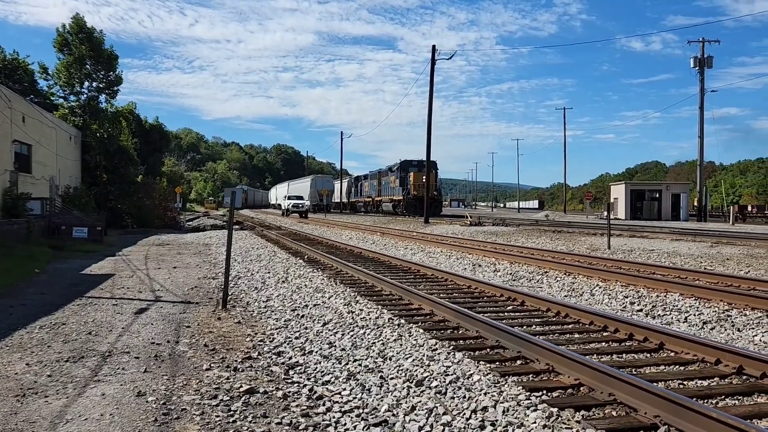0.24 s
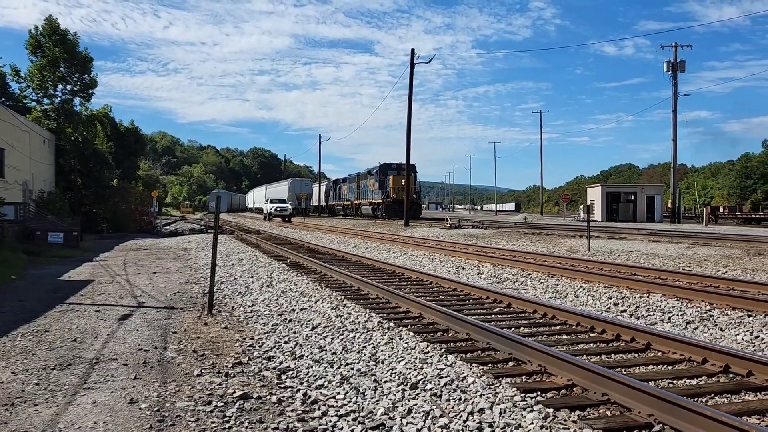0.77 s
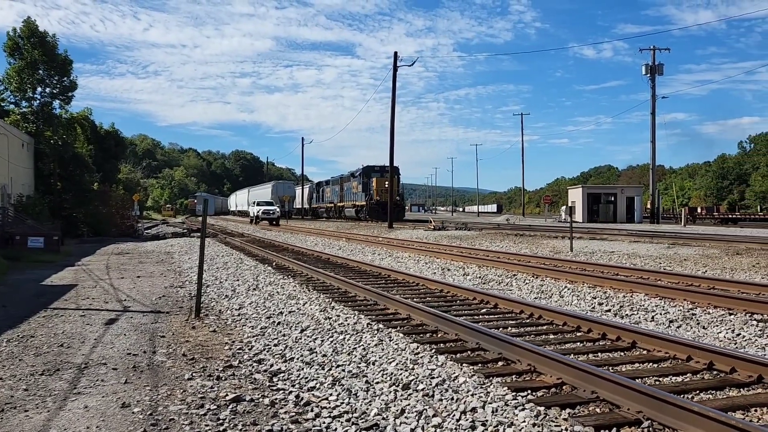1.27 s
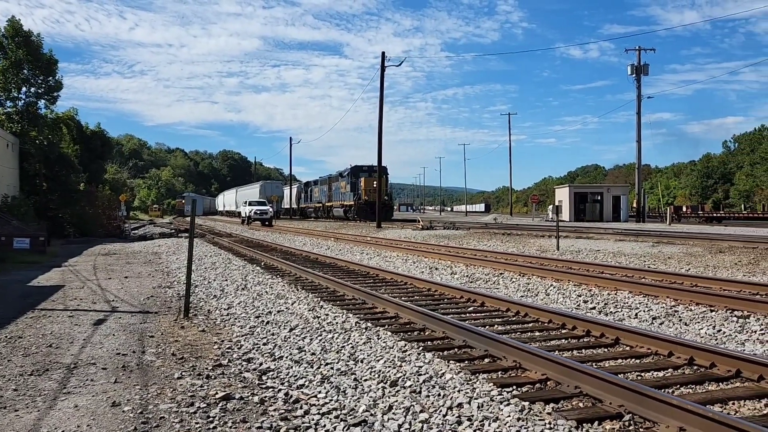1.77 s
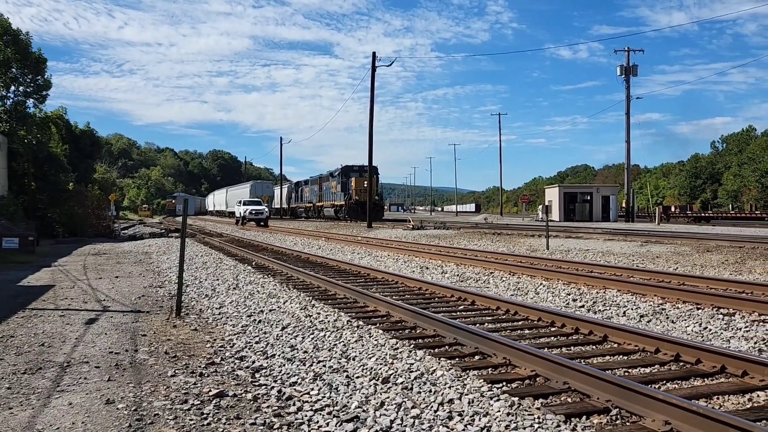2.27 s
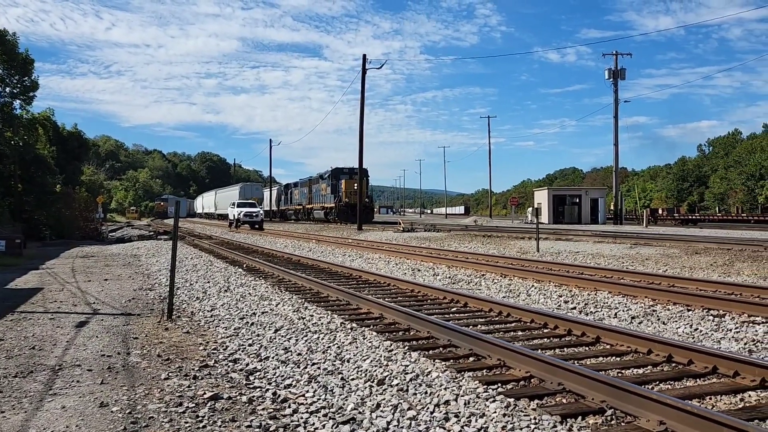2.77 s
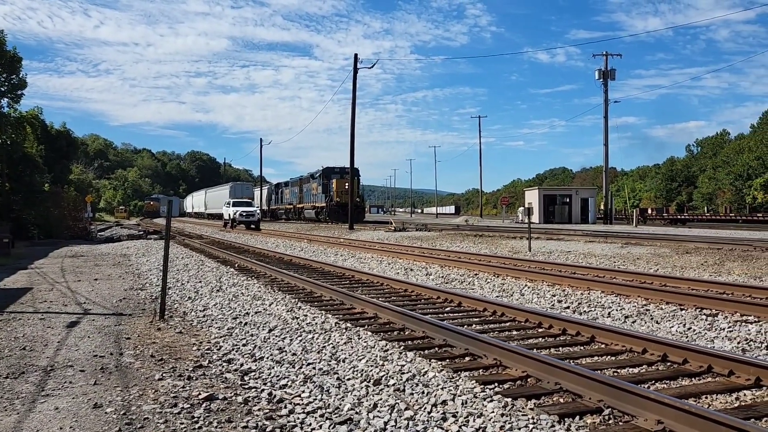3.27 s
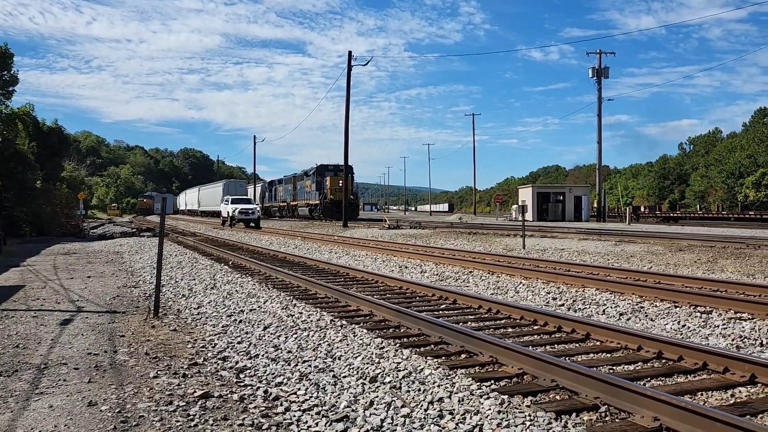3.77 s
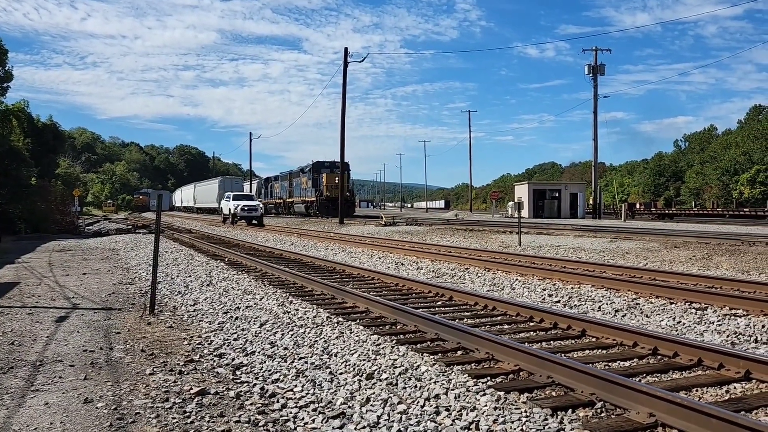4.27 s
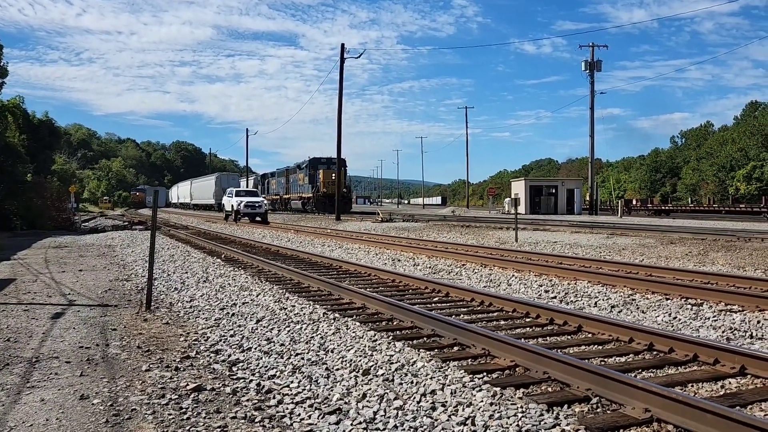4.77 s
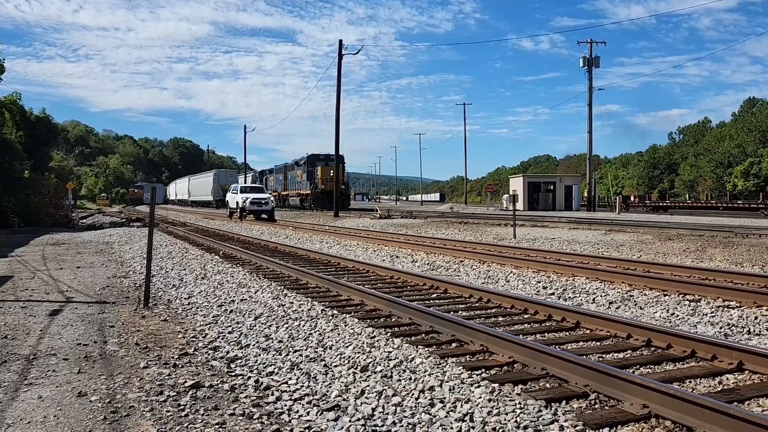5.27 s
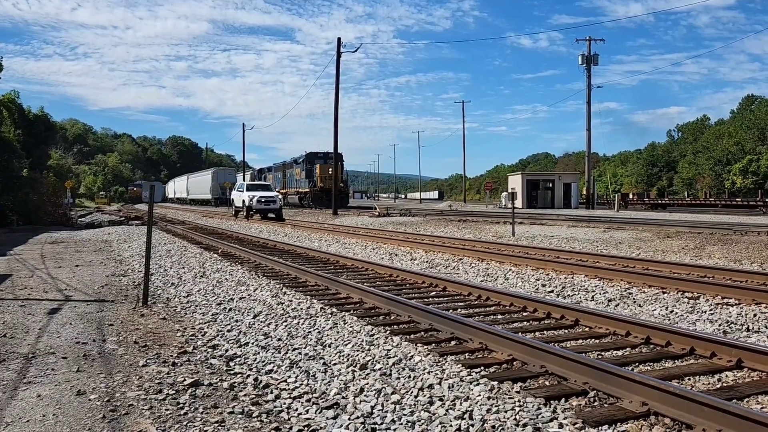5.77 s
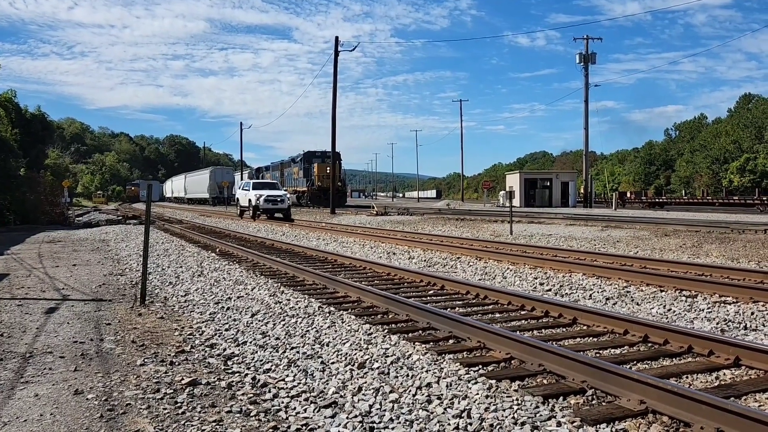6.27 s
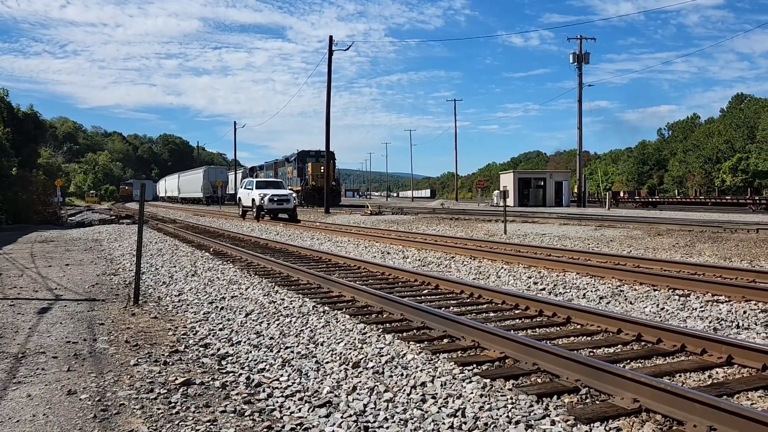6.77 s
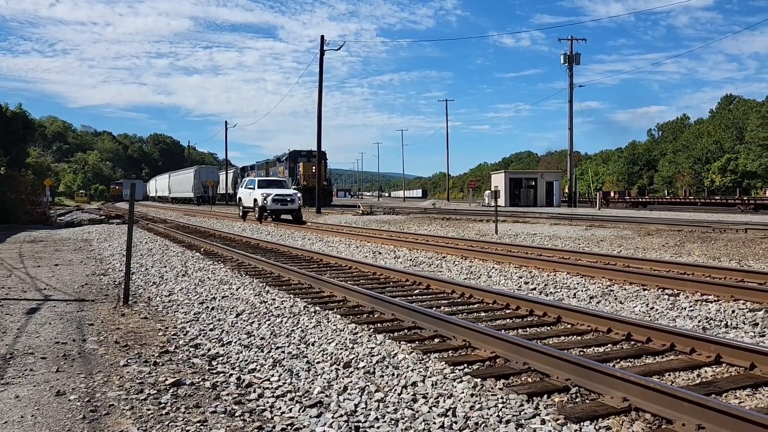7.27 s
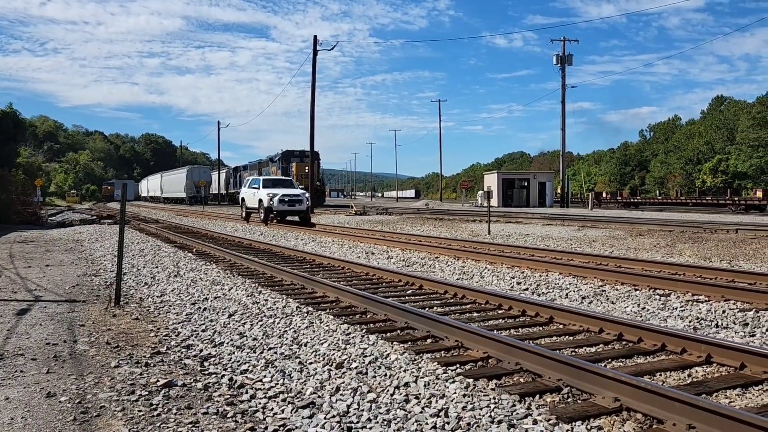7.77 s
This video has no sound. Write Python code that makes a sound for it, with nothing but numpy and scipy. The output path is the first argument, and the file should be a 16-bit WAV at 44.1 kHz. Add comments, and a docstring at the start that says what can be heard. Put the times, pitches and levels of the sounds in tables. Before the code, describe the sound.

Diesel locomotives idle with a low throb and whine, and one lets off a short hiss of air.

```python
"""Two diesel locomotives idle some way off in a rail yard, their exhaust pulses ringing the stacks:
one throbs once a crankshaft turn as its cylinders fire unequally, the other ticks over more slowly.
Fans and valve gear rush, meshing gears whine, and a thin whistle comes and goes.
An air valve spits twice, then blows off in a turbulent jet that dulls as the pressure falls.
Behind them a car rolls up on gravel, something rasps once, and grasshoppers sing in the weeds."""
import sys
import numpy as np
from scipy import signal
from scipy.fft import rfft, irfft
from scipy.io import wavfile

SR = 44100
rng = np.random.default_rng(int(sys.argv[2]) if len(sys.argv) > 2 else 0)


def generate_wav(signal):
    """Clip the signal to [-1, 1] and save it as 16-bit WAV at the path in sys.argv[1]."""
    frames = np.transpose(np.atleast_2d(signal))
    scaled = np.clip(frames, -1, 1) * 32767
    pcm = np.round(scaled).astype(np.int16)
    wavfile.write(sys.argv[1], SR, pcm)


N = 354123
T = np.arange(N) / SR
FREQ = np.fft.rfftfreq(N, 1 / SR)
CYLINDERS = 8


def undb(db):
    """Amplitude ratio of a level in decibels."""
    return 10 ** (np.asarray(db) / 20)


def unit(x):
    """Normalisation to an rms of 1."""
    return x / np.sqrt(np.mean(x ** 2))


def curve(rows, column=1):
    """Linear interpolation of one table column over time."""
    rows = np.array(rows)
    return np.interp(T, rows[:, 0], rows[:, column])


def spread(points):
    """Interpolation of (frequency_hz, value) points on a log-frequency axis."""
    hz, value = np.transpose(points)
    return np.interp(np.log(FREQ + 1), np.log(hz), value)


def ramp(start_s, length_s):
    """Linear rise from 0 to 1."""
    return np.clip((T - start_s) / length_s, 0, 1)


def envelope(start_s, rise_s, hold_s, fall_db_per_s):
    """Linear attack, hold and exponential decay."""
    return ramp(start_s, rise_s) * undb(-fall_db_per_s * np.maximum(T - start_s - rise_s - hold_s, 0))


def swell(centre_s, half_length_s):
    """Gaussian pulse of height 1."""
    return np.exp(-((T - centre_s) / half_length_s) ** 2)


def walk(rate_hz, count=8192):
    """Random modulation: low-passed noise of rms 1 that changes about rate_hz times a second."""
    white = rfft(rng.standard_normal(count))
    slow = irfft(white / (1 + (2 * FREQ[:len(white)] / rate_hz) ** 4))
    return np.interp(T, np.linspace(0, T[-1], count), unit(slow))


# Coherence between the ears at full focus: frequency_hz, coherence
COHERENCE = [(100, .997), (160, .985), (250, .9), (430, .76), (520, .88), (800, .7), (1300, .4),
             (2500, .55), (4000, .5), (7000, .25), (12000, .25)]
# Phase difference between the ears: frequency_hz, left_lead_rad
PHASE_LEAD = [(110, 0), (250, .25), (520, .4), (780, .8), (1000, 1.6), (1600, 2.5), (1850, 6.6),
              (2900, 9.2), (3300, 11.6), (4300, 13.3), (5300, 17.6), (9500, 17.3), (10500, 18.9)]
# Level difference between the ears: frequency_hz, left_minus_right_db
BALANCE = [(120, 0), (300, -2), (600, -0.5), (1100, -2.5), (1700, -2.5), (2200, 5.5), (3000, 12),
           (4400, 6.5), (6500, 0.5), (8200, 8), (9100, 12), (13000, 5.5)]
def noise(spectrum, focus=0.91):
    """Direct and diffuse fields: one noise reaches the left ear first, scatter differs at each ear."""
    direct, *scatter = rfft(rng.standard_normal((3, N)))
    coherence = np.clip(focus * spread(COHERENCE), 0, 1)
    side = np.array([[1], [-1]]) / 2
    coherent = np.sqrt(coherence) * direct * np.exp(1j * side * spread(PHASE_LEAD))
    diffuse = np.sqrt(1 - coherence) * np.array(scatter)
    gain = undb(spread(spectrum) + side * spread(BALANCE))
    return unit(irfft((coherent + diffuse) * gain, N))


def tone(clock_s, hz, level_db, pan_db):
    """Multipath interference: echoes make a slightly wobbling tone flutter differently at each ear."""
    unrest = np.hypot(1, hz / 1500)  # higher tones wobble more and flutter faster
    phase = 2 * np.pi * hz * clock_s + .42 * unrest * walk(11)
    direct = np.exp(1j * np.array([[np.interp(hz, FREQ, spread(PHASE_LEAD))], [0]]))
    echoes = np.array([walk(14 * unrest) + 1j * walk(14 * unrest) for _ in range(2)])
    wave = unit(np.real((direct + .38 * echoes) * np.exp(1j * phase)))
    return wave * undb(level_db) * undb(np.array([[pan_db], [-pan_db]]) / 2)


# Spectrum of the grasshopper chorus: frequency_hz, relative_db
CHORUS_SPECTRUM = [(7000, -30), (8300, -15), (8900, -5.5), (9120, -2), (9210, 2), (9320, -5), (9500, -14),
                   (9900, -26), (11300, -34), (12200, -30), (12700, -24), (14200, -25), (15500, -35)]
def grasshoppers():
    """Stridulation: many insects sum to a high, shimmering band of noise that grows near the end."""
    late_swell_db = 3 * ramp(start_s=7.3, length_s=0.32)
    return noise(CHORUS_SPECTRUM) * undb(-52 + late_swell_db + 0.5 * walk(25))


# Spectrum of tyres on gravel: frequency_hz, relative_db
TYRE_SPECTRUM = [(120, -19.5), (250, 4), (350, 1.5), (450, -12.5), (620, 2), (1000, -10), (3000, -17.5),
                 (5500, -19.5), (7400, -23.5), (9000, -36), (11000, -67.5)]
def car():
    """Rolling noise: the soft sound of tyres on gravel rises as a car comes slowly up."""
    return noise(TYRE_SPECTRUM) * undb(-42 + 1.2 * walk(3.8)) * ramp(start_s=1.23, length_s=1.9)


def distant_rasp():
    """A short pulse of band-limited noise, heard as a faint rasp far down the yard."""
    band = noise([(1300, -33), (1750, 11), (2050, 6), (2500, -49)])
    return band * undb(-39) * swell(centre_s=6.64, half_length_s=.055)


# Course of the whistle: time_s, relative_db, pitch_hz
WHISTLE_PATH = [(0, -67, 5698), (.85, -66.5, 5722), (1.15, -73, 5700), (1.4, -65, 5684), (1.7, -62.5, 5676),
                (1.9, -75, 5690), (2.35, -66, 5700), (3.1, -59.5, 5694), (4, -64, 5692), (4.2, -75, 5692),
                (4.45, -62.5, 5694), (4.95, -73, 5692), (5.7, -66, 5688), (6.9, -75, 5692),
                (7.4, -65.5, 5698), (8.03, -74, 5695)]
def whistle():
    """Slow amplitude and frequency modulation: a thin tone comes and goes and wanders in pitch."""
    nominal_hz = 5715
    clock_s = np.cumsum(curve(WHISTLE_PATH, column=2) / nominal_hz) / SR
    return tone(clock_s, nominal_hz, curve(WHISTLE_PATH) + 1.3, pan_db=8)


# Tones of the blower and auxiliary drives: pitch_hz, relative_db, left_minus_right_db
DRIVE_TONES = [(522, -47.5, 0), (535, -48, 0), (797, -48.5, -2), (872, -48.5, -2), (1086, -54, -3),
               (1234, -46, -3), (1368, -50.5, 0)]
def drives(clock_s):
    """Rotational tones: the drives follow the crankshaft in pitch; late on they grow a little quieter."""
    tones = sum(tone(clock_s, hz, db - 1, pan_db) for hz, db, pan_db in DRIVE_TONES)
    return tones * undb(-3.5 * ramp(start_s=5.9, length_s=1.6))


# Swell and fade of each numbered gear harmonic: time_s, relative_db
GEAR_2 = [(0, -42), (.65, -39.5), (1.1, -40.5), (1.75, -36.5), (2.15, -39), (2.7, -50), (2.94, -43),
          (3.2, -49), (3.9, -55), (4.5, -47), (5.1, -45), (5.47, -40), (6.3, -44), (7, -44), (7.5, -50),
          (8.03, -46)]
GEAR_3 = [(0, -43), (.6, -44), (.77, -51), (.95, -43), (1.2, -43.5), (1.5, -49), (1.62, -42), (1.9, -43.5),
          (2.5, -49), (3.05, -44), (3.33, -40), (3.6, -49), (3.9, -48), (4.15, -42), (4.4, -47),
          (4.85, -52), (5.5, -42.5), (6.3, -45.5), (6.6, -49), (8.03, -50)]
GEAR_4 = [(0, -47), (8.03, -65)]
GEAR_5 = [(0, -54), (2.4, -56), (3.1, -54), (4.1, -54), (4.4, -62), (5.3, -50.5), (5.8, -51), (6.6, -58),
          (8.03, -55)]
GEAR_10 = [(0, -60), (.3, -62), (.7, -57.5), (1.3, -57), (2, -58), (2.4, -65), (3.1, -58.5), (4, -57.5),
           (4.4, -60), (5.05, -59.5), (5.3, -66), (5.85, -59.5), (6.4, -65), (6.8, -61.5), (7.1, -66),
           (7.5, -62), (8.03, -64)]
GEAR_15 = [(0, -65), (.6, -68), (1, -66), (1.35, -72), (1.85, -63.5), (2.4, -66), (3.15, -60.5), (4, -62),
           (4.4, -62), (4.9, -73), (5.25, -64), (5.7, -63.5), (6, -69), (6.25, -69), (6.47, -60.5),
           (6.6, -68), (6.8, -62), (7.1, -66), (7.3, -71), (8.03, -71)]
# Harmonics of the mesh rate: harmonic, level_curve, gain_db, left_minus_right_db
GEAR_TONES = [(2, GEAR_2, -2, -4), (3, GEAR_3, 2, 3), (4, GEAR_4, -1.5, 1.5), (5, GEAR_5, -1, 1),
              (10, GEAR_10, 3, 3), (15, GEAR_15, 2.3, 5)]
# Squeals at the fifth harmonic: centre_s, half_length_s, level_db
SQUEALS = [(.42, .06, -46.5), (.8, .06, -50), (1.05, .06, -47.5), (1.35, .05, -49), (3.24, .06, -45.5),
           (4.09, .05, -45.5), (4.63, .05, -43.5), (4.9, .09, -46.5), (6.86, .04, -50), (7.07, .05, -49),
           (7.8, .08, -50.5)]
def gear_train(clock_s):
    """Periodic tooth contact radiates harmonics of the mesh rate; the fifth swells into rough squeals."""
    mesh_hz = 431
    whine = sum(tone(clock_s, harmonic * mesh_hz, curve(levels) + gain_db, pan_db)
                for harmonic, levels, gain_db, pan_db in GEAR_TONES)
    bursts = sum(swell(centre_s, half_s) * undb(db) for centre_s, half_s, db in SQUEALS)
    squeals = bursts * tone(clock_s, 5 * mesh_hz, level_db=0, pan_db=1)
    roughness = 1 + .4 * walk(55)
    return whine + squeals * roughness


# Spectrum of the fans and valve gear behind the hood doors: frequency_hz, relative_db
FAN_SPECTRUM = [(200, -16.5), (450, -7), (520, 3), (690, 4), (830, 3), (920, -1), (1040, -0.5), (1150, -4),
                (1300, -0.5), (1400, 2), (1650, -5.5), (2150, -6.5), (2900, -16), (4300, -18.5),
                (5050, -21.5), (5550, -25), (6100, -26), (6850, -29), (7500, -28), (8300, -34.5),
                (11000, -77), (13000, -45.5), (15000, -47.5)]
# Slow drift of their treble: time_s, gain_db
FAN_TREBLE = [(0, 0.9), (1, 0.7), (1.6, 0), (2.2, -0.2), (3, 1.8), (4.2, 0), (6.3, 0), (7.3, -1.8),
              (8.03, -2.5)]
def fans_and_valve_gear(turns):
    """Broadband rush, modulated lightly at the firing rate; moving air makes its treble come and go."""
    clatter = 1 + 0.049 * np.cos(2 * np.pi * CYLINDERS * turns) + 0.064 * walk(40)
    rush = noise(FAN_SPECTRUM) * clatter
    treble = signal.sosfilt(signal.butter(1, 1200, "high", fs=SR, output="sos"), rush)
    treble_gain = undb(0.27 * walk(5.3) + curve(FAN_TREBLE))
    return (rush + treble * (treble_gain - 1)) * undb(-33)


# Narrow peaks in the hiss of escaping air: centre_hz, width_hz, lift_db
HISS_PEAKS = [(2150, 200, 4), (4450, 110, 2.5), (4900, 70, 5.5), (5600, 130, -0.5), (5600, 130, 1.5),
              (7300, 80, 5), (7650, 60, 7), (8100, 60, 3.5)]
def colour_hiss(air):
    """Spectral colouration: narrow peaks colour the hiss of escaping air, as from a ground reflection."""
    lift_db = sum(db * np.exp(-((FREQ - hz) / width_hz) ** 2) for hz, width_hz, db in HISS_PEAKS)
    return irfft(rfft(air) * undb(lift_db - lift_db[FREQ < 9000].mean()), N)


# Spits of air: start_s, level_db, rise_s, hold_s, fall_db_per_s, centre_hz, width_hz
SPITS = [(1.97, -50.5, .04, .05, 90, 7500, 5500), (2.16, -55, .05, .08, 90, 8000, 6540),
         (3.39, -28.5, .011, .004, 380, 5000, 4700), (3.425, -29.5, .025, .03, 190, 5300, 4200),
         (3.676, -34.5, .014, .025, 190, 4100, 1800), (3.68, -37, .045, .045, 380, 8300, 1100),
         (3.67, -37, .03, .09, 300, 6200, 3400)]
def air_spits():
    """Transient jets: two faint puffs come first, then louder ones as the valve opens and shuts."""
    spits = 0
    for start_s, db, rise_s, hold_s, fall_db_per_s, hz, width_hz in SPITS:
        band = [(max(hz - width_hz, 100), -18), (hz, 0), (hz + width_hz, -12), (hz + 2 * width_hz, -40)]
        spits += noise(band) * undb(db) * envelope(start_s, rise_s, hold_s, fall_db_per_s)
    return spits


# Spectra of the jet, the lower rush of the pipe and the top sizzle: frequency_hz, relative_db
JET_SPECTRUM = [(500, -42), (1200, -1), (2100, -1), (2800, -11), (3900, 2.5), (5500, 3.5), (7500, 0.5),
                (9300, -3.5), (11000, -41), (15000, -33)]
PIPE_SPECTRUM = [(700, -24.5), (1400, -3), (2150, -2.5), (2800, -7.5), (4000, -6), (7000, -32)]
SIZZLE_SPECTRUM = [(5000, -27), (8000, -3.5), (10500, -4), (13000, 1), (15500, -5)]
def air_valve():
    """Turbulent jet noise: higher bands follow higher powers of the flow, so the falling blow-off dulls."""
    open_s, shut_s, shutting_s, leak_db = 3.391, 3.73, 0.04, -6.5
    sputter = undb(0.7 * walk(120) + .5 * walk(22))
    flow = envelope(open_s, rise_s=0.06, hold_s=0.048, fall_db_per_s=44)
    flow *= undb(leak_db * ramp(shut_s, shutting_s))  # shutting leaves a dying leak
    seat_hiss = envelope(shut_s, shutting_s, hold_s=0.22, fall_db_per_s=87)
    jet = noise(JET_SPECTRUM, focus=0.59) * (undb(-27.5) * flow + undb(-58) * seat_hiss)
    pipe = noise(PIPE_SPECTRUM, focus=0.77) * undb(-32) * flow ** .6
    sizzle = noise(SIZZLE_SPECTRUM, focus=0.71) * (undb(-29) * flow ** 1.8 + undb(-58.5) * seat_hiss)
    return sputter * (colour_hiss(jet + air_spits()) + pipe + sizzle)


def exhaust_stack(cycles, harmonics, waver_db, bark_db, bark_above):
    """A periodically driven resonator: wavering harmonics, shifted by bark_db above order bark_above."""
    orders, levels_db = np.transpose(harmonics)
    floor_db = -63
    response_db = np.interp(np.arange(129), np.r_[0, orders, 2 * orders[-1], 128],
                            np.r_[floor_db, levels_db, floor_db, floor_db])
    cepstrum = irfft(np.log(undb(response_db)))[:128]
    phase_rad = np.imag(rfft(2 * cepstrum, 256))  # minimum phase, as in a causal resonator
    note = 0
    for order, db in zip(orders, levels_db):
        gain = undb(db + waver_db * walk(2.1) + bark_db * (order > bark_above))
        note += gain * np.cos(2 * np.pi * order * cycles + phase_rad[round(order)])
    return np.sqrt(2) * note


# Exhaust harmonics of the slower engine: multiple_of_cycle_rate, relative_db
SLOW_HARMONICS = [(6, -45), (8, -54), (9, -36), (10, -47), (12, -33), (14, -46), (17, -34), (23, -42),
                  (30, -43), (32, -53), (34, -49), (36, -51), (40, -57), (46, -60), (59, -58)]
def slow_engine():
    """Beating: a slower, quieter idle interferes with the main one, its upper harmonics easing off."""
    cycle_hz = 5.777 * (1 + 0.0023 * walk(0.84))
    cycles = np.cumsum(cycle_hz) / SR
    return undb(-2) * exhaust_stack(cycles, SLOW_HARMONICS, waver_db=3, bark_db=8 - 1.15 * T, bark_above=25)


# Slow hunting of the main engine's governor: time_s, firing_hz
FIRING_RATE = [(0, 87.42), (1, 87.5), (2.3, 87.33), (3.8, 87.2), (4.6, 87.42), (5.7, 87.5), (8.03, 87.27)]
def crankshaft():
    """Phase is the integral of speed: returns the turns made and a clock that runs with the engine."""
    firing_hz = curve(FIRING_RATE)
    first_beat_s = .044
    firings = np.cumsum(firing_hz) / SR - first_beat_s * firing_hz[0]
    clock_s = np.cumsum(firing_hz / firing_hz.mean()) / SR
    return firings / CYLINDERS, clock_s


# Exhaust harmonics of the main engine: multiple_of_crankshaft_rate, relative_db
MAIN_HARMONICS = [(4, -33), (5, -46), (6, -33.5), (7, -17.5), (8, -15), (9, -41.5), (10, -19), (11, -40.5),
                  (12, -42), (13, -28), (14, -51), (15, -38), (16, -46), (17, -39), (18, -55), (19, -60.5),
                  (20, -55.5), (21, -50), (25, -56.5), (27, -61), (30, -57.5), (33, -61), (36, -58)]
# Course of its throb: time_s, level_db, bark_db, lull_depth, lull_position_turns, mid_beat_share
THROB = [(0, -14.5, -7, .6, 0.012, 0.65), (1.1, -13.5, -2.5, .58, 0.0085, 0.65),
         (2.1, -17.5, -3.5, .3, .02, 0.19), (3.3, -15.5, -3.5, 0.35, .03, 0.32),
         (4, -15, -2.5, 0.55, .03, 0.17), (5, -15, -1.5, 0.59, .01, 0.31), (6.3, -17, -3, 0.38, .02, 0.12),
         (8.03, -17, -1, .42, .02, 0.15)]
# Spectrum of turbulent exhaust gas: frequency_hz, relative_db
GAS_SPECTRUM = [(15, -23.5), (26, -28), (42, -10.5), (75, 6), (105, 1.5), (150, 0.5), (200, -10),
                (240, -11), (290, -14.5), (345, -14.5), (450, -20.5), (900, -88.5)]
def main_engine(turns):
    """Amplitude modulation: unequal cylinders make the exhaust throb, with a lull after the weak ones."""
    level_db, bark_db, lull_depth, lull_turns, mid_beat_share = (curve(THROB, c) for c in range(1, 6))
    depth = np.clip(lull_depth + 0.17 * walk(6), .2, .85)
    lull = np.cos(np.pi * (turns - lull_turns)) ** 4
    mid_beat_sag = mid_beat_share * np.cos(np.pi * (turns - .45)) ** 6
    note = exhaust_stack(turns, MAIN_HARMONICS, waver_db=.3, bark_db=bark_db, bark_above=CYLINDERS + 1)
    throb = unit(note * (1 - depth * (lull + mid_beat_sag)))
    gas = noise(GAS_SPECTRUM) * (1 + 0.25 * np.cos(2 * np.pi * (turns - .6)))  # peaks late in each beat
    return throb * undb(level_db) + gas * undb(-31.6)


def scene():
    """Superposition of both engines, their machinery, the air valve and the yard."""
    turns, clock_s = crankshaft()
    engines = main_engine(turns) + slow_engine()
    machinery = fans_and_valve_gear(turns) + gear_train(clock_s) + drives(clock_s) + whistle()
    return engines + machinery + air_valve() + distant_rasp() + car() + grasshoppers()


def record(dry):
    """Band limiting: a steep low-pass filter removes the highest treble."""
    cutoff_hz = 15700
    return signal.sosfilt(signal.ellip(10, .1, 80, cutoff_hz, fs=SR, output="sos"), dry)


dry = scene()
out = record(dry)
generate_wav(out)
```